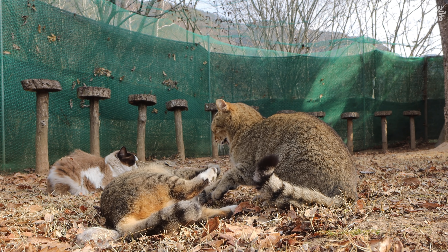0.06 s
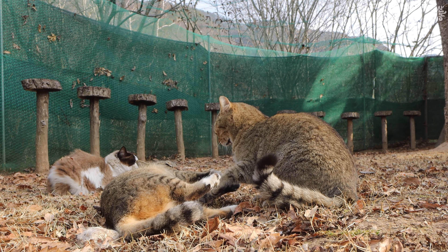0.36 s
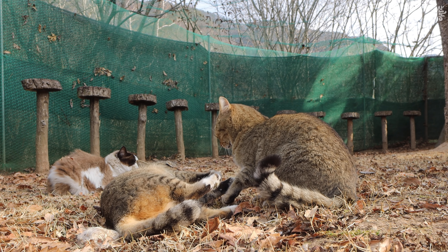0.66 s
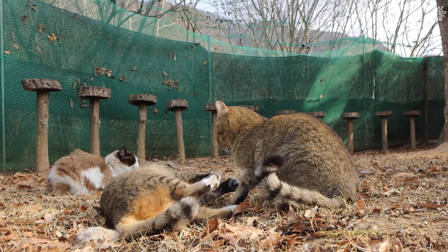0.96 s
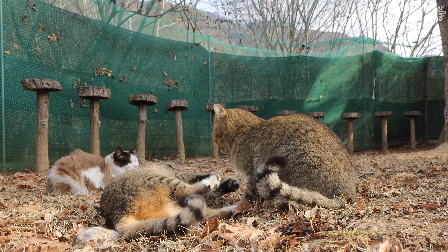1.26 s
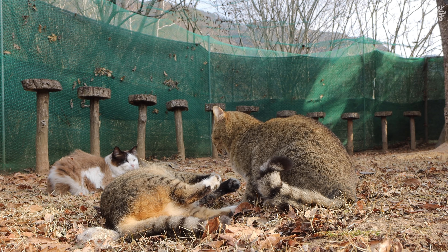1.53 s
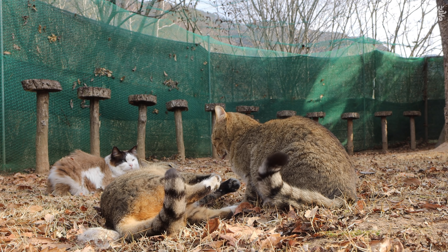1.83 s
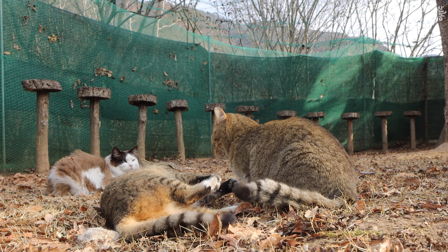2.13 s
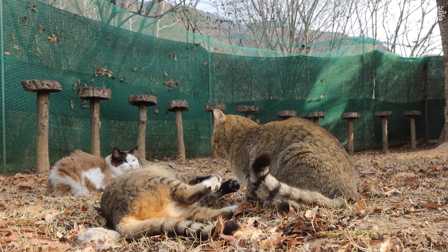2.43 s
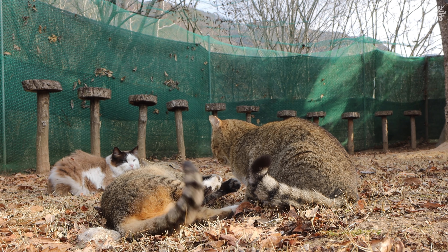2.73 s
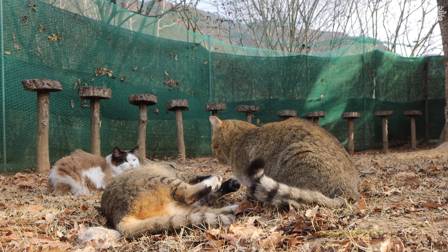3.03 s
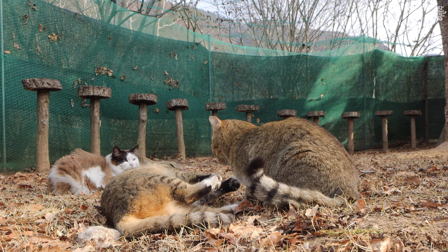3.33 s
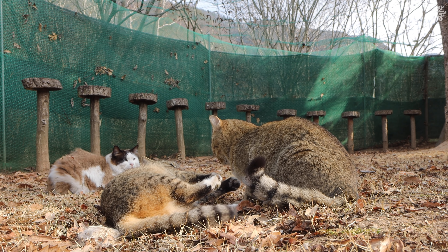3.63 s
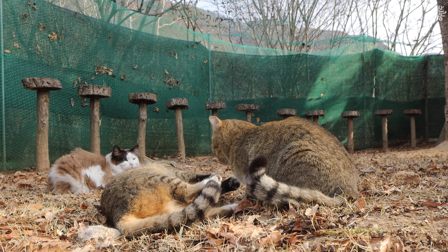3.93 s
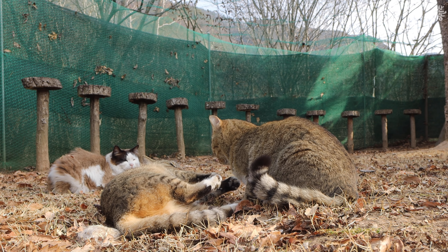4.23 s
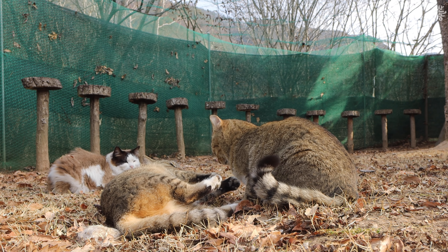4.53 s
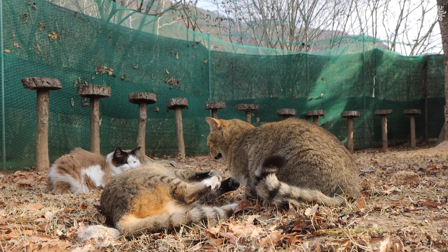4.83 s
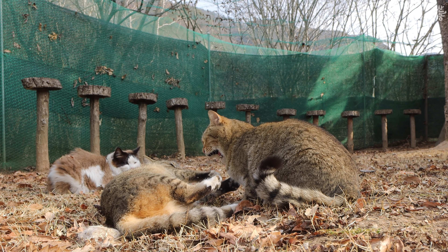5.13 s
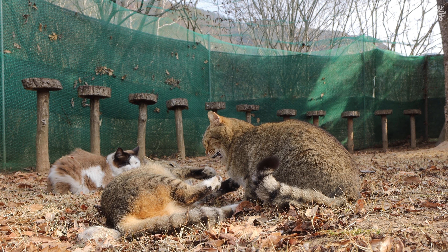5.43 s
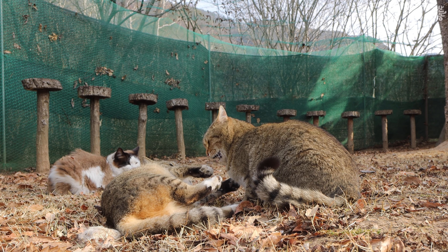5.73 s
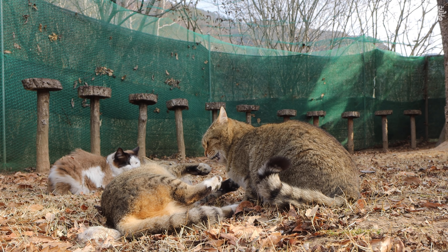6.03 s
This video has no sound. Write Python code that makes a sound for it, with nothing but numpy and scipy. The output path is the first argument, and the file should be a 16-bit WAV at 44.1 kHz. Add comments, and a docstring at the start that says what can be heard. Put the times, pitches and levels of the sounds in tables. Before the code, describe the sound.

A cat gives two long, drawn-out yowls outdoors, with faint raspy bird chirps and a couple of brief leaf rustles between them.

```python
"""A fenced yard, where two cats square off on dry leaves. One yowls twice: its vocal folds drive the
resonances of a throat whose mouth opens wide, then closes to a thin whine. Between the yowls come a
faint moan, tail swishes in the leaves and a soft thud. Off to the right a small bird scolds in raspy,
frequency-modulated notes, and one thin whistle falls. Trees and fence scatter a short echo, and a low
outdoor rumble lies under it all."""
import sys
import numpy as np
from scipy import signal
from scipy.fft import rfft, irfft, next_fast_len
from scipy.io import wavfile
from scipy.ndimage import map_coordinates

SR = 44100
rng = np.random.default_rng(int(sys.argv[2]) if len(sys.argv) > 2 else 0)


def generate_wav(sig):
    """Save sig (samples, or channels by samples) to the path in sys.argv[1] as 16-bit PCM at SR."""
    pcm = np.round(np.clip(np.atleast_2d(sig).T, -1, 1) * 32767).astype(np.int16)
    wavfile.write(sys.argv[1], SR, pcm)


N = 267674
TIME = np.arange(N) / SR


def amp(db):
    """Decibels to amplitude ratio."""
    return 10 ** (np.asarray(db) / 20)


def unit(x):
    """Normalisation to rms 1."""
    return x / np.sqrt(np.mean(x ** 2) + 1e-20)


def along(points, hz):
    """Interpolation of (Hz, value) points on a logarithmic frequency axis."""
    knots_hz, values = np.transpose(points)
    return np.interp(np.log(hz + 1), np.log(knots_hz + 1), values)


def curves(rows, at=TIME):
    """Linear interpolation of each later column against the first."""
    knots, *columns = np.transpose(rows)
    return [np.interp(at, knots, column) for column in columns]


def gate(start, end, edge_s=0.0068):
    """A window of one from start to end, with soft edges outside."""
    return np.clip(1 + np.minimum(TIME - start, end - TIME) / edge_s, 0, 1) ** 2


def bump(x, width):
    """A Gaussian bell around zero."""
    return np.exp(-(x / width) ** 2)


def wobble(rate):
    """Smooth random modulation: a spline through `rate` knots a second."""
    return map_coordinates(rng.standard_normal(int(N * rate / SR) + 4), [TIME * rate])


def filtered(x, response):
    """Linear filtering: the spectrum is multiplied by a frequency response."""
    size = next_fast_len(N + 8192)
    return irfft(rfft(x, size) * response(np.fft.rfftfreq(size, 1 / SR)), size)[..., :N]


def noise(spectrum, coherence):
    """Coloured stereo noise of rms 1: the balance of mid and side sets the left-right coherence."""
    def response(hz):
        angle = np.arccos(np.clip(along(coherence, hz), -1, 1)) / 2
        return amp(along(spectrum, hz)) * [np.cos(angle), np.sin(angle)]
    mid, side = filtered(rng.standard_normal((2, N)), response)
    return unit(np.array([mid + side, mid - side]))


def cycle(hz):
    """Phase as the integral of frequency."""
    return 2 * np.pi * np.cumsum(hz) / SR


def pan(left_db):
    """Direction by level difference, left minus right."""
    return amp(np.array([[.5], [-.5]]) * left_db)


# Spectrum of the outdoor air. Each row: frequency in Hz, relative level in dB.
AIR_SPECTRUM = [(12, -22.5), (22, -11.5), (65, -5), (105, -5), (180, -4), (330, -6), (480, -8),
                (700, -11.5), (1200, -14.5), (1700, -20), (3500, -28.5), (5600, -33), (8000, -47.5),
                (14000, -51)]
# Likeness of the air at the two ears. Each row: frequency in Hz, coherence from 0 to 1.
AIR_COHERENCE = [(25, .95), (70, .62), (200, .58), (700, .55), (1500, .4), (5000, .15)]


def rumble(db=-47):
    """Distant outdoor noise drifts in level; its coherence between the ears falls with frequency."""
    return amp(db + 0.3 * wobble(1)) * noise(AIR_SPECTRUM, AIR_COHERENCE)


# The bird's scolding notes. Each row: start in seconds, level in dB.
SCOLD_NOTES = [(-.008, -49), (0.157, -52), (1.27, -49), (1.427, -47.5), (1.584, -50.5), (3.506, -52.5),
               (3.658, -52.5), (3.814, -53), (5.229, -51.5), (5.379, -51), (5.532, -55)]
# Spectrum of their rasp. Each row: frequency in Hz, relative level in dB.
RASP_SPECTRUM = [(2500, -29.5), (3500, -9.5), (4300, -8.5), (5500, -6.5), (7000, -4), (8500, -7),
                 (9700, -17.5), (12000, -40.5), (16000, -53.5)]
NOTE_S, NOTE_EDGE_S = 0.089, 0.014
LOW_VOICE_HZ, LOW_TURN_S, LOW_RISE_HZ = 4104, .028, 1810  # falls, turns and rises
HIGH_VOICE_HZ, HIGH_RISE_HZ = 7100, 1850  # rises ever faster
HIGH_PEAK_S, HIGH_WIDTH_S = .056, .025  # and sounds mostly in mid note


def scolding(rasp_db=-1.0, low_db=-1.5, high_db=-3):
    """Biphonation: each note is two fluttering, gliding voices inside amplitude-modulated noise."""
    notes = np.zeros((2, N))
    rasp = noise(RASP_SPECTRUM, [(5000, .1)]) * amp(2 * wobble(350))
    low_flutter = 1 + .02 * wobble(600) + .012 * wobble(70)
    high_flutter = 1 + .024 * wobble(900) + .012 * wobble(90)
    detunings = 1 + 0.015 * rng.standard_normal(len(SCOLD_NOTES))
    for (start, db), detune in zip(SCOLD_NOTES, detunings):
        envelope = gate(start, start + NOTE_S, NOTE_EDGE_S)
        on = envelope > 0
        t = TIME[on] - start
        low_hz = LOW_VOICE_HZ + LOW_RISE_HZ * ((t - LOW_TURN_S) / (NOTE_S - LOW_TURN_S)) ** 2
        high_hz = HIGH_VOICE_HZ + HIGH_RISE_HZ * (t / NOTE_S) ** 2
        high_swell = bump(t - HIGH_PEAK_S, HIGH_WIDTH_S)
        low = amp(low_db) * np.sin(cycle(detune * low_hz * low_flutter[on]))
        high = amp(high_db) * high_swell * np.sin(cycle(detune * high_hz * high_flutter[on]))
        notes[:, on] += envelope[on] * amp(db) * (low + high + amp(rasp_db) * rasp[:, on])
    return notes * pan(left_db=-6)


# Colour of the cat's voice on its way over the ground. Each row: frequency in Hz, gain in dB.
VOICE_COLOUR = [(500, 0), (1100, -1.1), (1700, -24.2), (2400, -14.4), (3300, -26.1), (4200, -10.2),
                (5000, 6.7), (6000, 11), (7100, 17), (8500, 8)]
# Damping of the throat. Each entry: bandwidth of one formant in Hz, lowest formant first.
FORMANT_WIDTHS = [106, 830, 347, 500]


def throat(hz, formants):
    """Four resonators in series multiply their responses; the fourth rides above the third."""
    gain = amp(along(VOICE_COLOUR, hz))
    for centre, width in zip([*formants, 1.246 * formants[-1]], FORMANT_WIDTHS):
        gain = gain * centre ** 2 / (centre ** 2 - hz ** 2 + 1j * hz * width)
    return gain


# The throat from shut to wide. Each row: opening from 0 to 1, source tilt in dB per octave,
# then the low, middle and upper formants in Hz.
MOUTH_SHAPES = [(0, -3.3, 764, 1320, 3170), (.2, -3.6, 905, 1970, 2350), (.4, -0.1, 1347, 1960, 2710),
                (.6, 1.8, 1622, 1910, 2760), (.8, 2.4, 1771, 2550, 2930), (1, 2.5, 1967, 3390, 3430)]
CATCH_HZ, CATCH_S, CATCH_DULL_DB = 223.1, .009, 11.5  # the voice breaks in dull and high, then settles
HOARSE_SHUT_DB, HOARSE_WIDE_DB = -12, -5  # turbulence in the throat grows with the opening
GROWL_AT_S, GROWL_S, GROWL_DB = 4.82, .08, 8  # a rasp as the second yowl swells
HOLLOW_HZ, HOLLOW_WIDTH_HZ, HOLLOW_DB, HOLLOW_S = 4500, 420, 12.5, 0.22  # overtones dip around the rasp


def yowl(contour, gape, catches=False, whine_jitter=0.0088, shimmer_db=0.29, lips_part=0.46, count=14):
    """Source and filter: vocal-fold harmonics and turbulence pass through a throat that changes shape."""
    window = gate(contour[0][0], contour[-1][0])
    on = window > 0
    pitch, db = curves(contour, TIME[on])
    opening, = curves(gape)
    tilt_db, *formants = curves(MOUTH_SHAPES, opening[on])
    catch = catches * np.exp(-np.maximum(TIME[on] - contour[0][0], 0) / CATCH_S)
    pitch += CATCH_HZ * catch
    tilt_db -= CATCH_DULL_DB * catch
    hollow_db = HOLLOW_DB * bump(TIME[on] - GROWL_AT_S, HOLLOW_S)
    growl_db = GROWL_DB * bump(TIME - GROWL_AT_S, GROWL_S)
    turbulence = amp(HOARSE_SHUT_DB + (HOARSE_WIDE_DB - HOARSE_SHUT_DB) * opening + growl_db)
    tremor = (.0011 + .0014 * turbulence) * wobble(200) + .001 * wobble(25)
    # with the mouth shut the folds run less steadily
    shut = np.clip(1 - opening[on] / lips_part, 0, 1)
    pitch *= 1 + tremor[on] + whine_jitter * shut * wobble(110)[on]
    phase = cycle(pitch)
    voice, power, envelope, puffs = np.zeros((4, N))
    for k in range(1, count + 1):
        source_db = (tilt_db + 0.45 * wobble(18)[on]) * np.log2(k)  # higher overtones waver more
        notch_db = hollow_db * bump(k * pitch - HOLLOW_HZ, HOLLOW_WIDTH_HZ)
        harmonic = amp(source_db - notch_db) * throat(k * pitch, formants)
        voice[on] += np.imag(harmonic * np.exp(1j * k * phase))
        power[on] += np.abs(harmonic) ** 2 / 2
    envelope[on] = amp(db + (shimmer_db + 1.4 * shut) * wobble(60)[on]) / np.sqrt(power[on])
    puffs[on] = (1 + np.cos(phase)) * rng.standard_normal(len(phase))  # air escapes once a cycle
    return window * envelope * (voice + turbulence * breath(puffs, gape))


def breath(puffs, gape, corner_hz=3000):
    """Aspiration: high-passed puffs of air hiss in the throat's moving upper resonances."""
    hz, t, spectra = signal.stft(puffs, SR, nperseg=512)
    hz = hz[:, None]
    opening, = curves(gape, t)
    _, *formants = curves(MOUTH_SHAPES, opening)
    highpass = hz ** 2 / (hz ** 2 + corner_hz ** 2)
    return signal.istft(spectra * highpass * np.abs(throat(hz, formants)), SR)[1][:N]


# Two open-mouthed yowls and the shut-mouthed whines that end them.
# Each row: time in seconds, pitch in Hz, level in dB.
FIRST_YOWL = [(0.0, 616, -16.5), (0.04, 621.7, -18), (0.122, 587, -17.5), (0.178, 556, -21.5),
              (0.346, 542, -24.5), (0.41, 560, -26), (0.456, 548, -29.5), (0.55, 535.3, -26.5),
              (0.594, 518.5, -25.5), (0.612, 524.4, -29.5), (0.65, 562, -40.5)]
FIRST_WHINE = [(.68, 576, -42), (0.729, 537.5, -45.5), (.97, 533, -44.5), (1.13, 519, -41),
               (1.36, 510.4, -40.5), (1.436, 467.6, -37), (1.456, 508, -41.5)]
SECOND_YOWL = [(4.63, 608.7, -42.5), (4.696, 538.6, -25), (4.72, 532.7, -25), (4.79, 560.0, -22.5),
               (4.928, 595.3, -18), (5.058, 587.8, -16.5), (5.292, 581.4, -17), (5.482, 547, -20),
               (5.56, 535.4, -24), (5.608, 515.5, -24), (5.626, 529.5, -27.5), (5.732, 531.6, -27),
               (5.836, 511.7, -26), (5.864, 490.6, -28), (5.89, 498.3, -37)]
SECOND_WHINE = [(5.914, 521, -39), (5.985, 520.7, -41), (6.02, 473.3, -33), (6.07, 500, -36)]
# The mouth in each yowl. Each row: time in seconds, opening from 0 (shut) to 1 (wide).
FIRST_GAPE = [(0, .95), (.06, 0.95), (0.121, 0.83), (.19, 0.68), (0.411, 0.62), (.47, 0.46), (0.601, 0.29),
              (.67, 0.048)]
SECOND_GAPE = [(4.63, 0.29), (4.7, 0.79), (4.8, 0.95), (4.919, 0.99), (5.35, 0.95), (5.519, 0.79),
               (5.601, 0.543), (5.831, .37), (5.911, 0.12)]


def yowls():
    """Phonation runs on as the mouth closes, so each of the two yowls trails off in a whine."""
    first = yowl(FIRST_YOWL + FIRST_WHINE, FIRST_GAPE)
    second = yowl(SECOND_YOWL + SECOND_WHINE, SECOND_GAPE, catches=True)
    return first + second


# Treble lost when the voice is dull. Each row: frequency in Hz, gain in dB.
TREBLE_CUT = [(3700, 0), (4400, -10.5), (5000, -14), (7000, -11)]
# The yowl's upper overtones. Each row: time in seconds, brightness from 0 (dull) to 1 (full).
BRIGHTNESS = [(4.6, 0.05), (4.68, 0.99), (4.93, 0.63), (5.08, 0.98)]
# Stereo balance of the voice. Each row: frequency in Hz, left minus right level in dB.
VOICE_BALANCE = [(550, 4.5), (1170, 1.5), (1930, 1), (3160, -0.5), (5200, -3.5)]


def voice_at_ears(voice, left_lead_s=.00003):
    """A crossfade varies the treble; level and time differences between the ears place the voice."""
    dull = filtered(voice, lambda hz: amp(along(TREBLE_CUT, hz)))
    brightness, = curves(BRIGHTNESS)
    heard = dull + brightness * (voice - dull)
    advance_s = np.array([[.5], [-.5]]) * left_lead_s
    return filtered(heard, lambda hz: pan(along(VOICE_BALANCE, hz)) * np.exp(2j * np.pi * hz * advance_s))


# Tails and paws in the leaves. Each row: peak time in seconds, level in dB, seconds to rise 20 dB,
# seconds to fall 20 dB, relative level of a stiff leaf's crack in dB.
SWISHES = [(0.595, -55.5, 0.013, 0.051, -7), (.709, -56.5, 0.012, .045, -9),
           (0.921, -61, 0.064, 0.0403, -20), (1.19, -56.5, 0.027, 0.2, -5), (2.109, -36, 0.021, 0.042, -14),
           (2.19, -49, 0.073, 0.12, -23), (2.532, -34.5, 0.045, 0.0087, -6.5),
           (2.596, -47, 0.2, 0.099, -18)]
# Spectra of swept leaves and of cracks. Each row: frequency in Hz, relative level in dB.
SWISH_SPECTRUM = [(300, -0.5), (1000, -1), (1800, -0.5), (2800, -7.5), (5500, -5.5), (8000, -1.5),
                  (10500, -7.5), (15000, -14)]
CRACK_SPECTRUM = [(700, -39), (1150, -8), (1500, -8.5), (1850, 1.5), (2100, -12.5), (2400, -4),
                  (3000, -23.5), (6000, -55)]


def leaves(crackle_db=3):
    """Noise under exponential envelopes: dry leaves crackle with each swish, and stiff ones crack."""
    swells = np.array([amp(db - 20 * np.maximum((peak - TIME) / rise, (TIME - peak) / fall))
                       for peak, db, rise, fall, _ in SWISHES])
    crackle = unit(noise(SWISH_SPECTRUM, [(1500, 0.88), (8000, 0.12)]) * amp(crackle_db * wobble(900)))
    swishes = np.linalg.norm(swells, axis=0) * crackle  # overlapping swishes add in power
    crack_gains = amp(np.array(SWISHES)[:, -1])
    cracks = crack_gains @ swells * noise(CRACK_SPECTRUM, [(1500, 0.87)]) * pan(left_db=5.0)
    return swishes + cracks


# Spectrum of the background hiss. Each row: frequency in Hz, relative level in dB.
HISS_SPECTRUM = [(1500, -22.5), (4000, 4), (8000, 0.5), (11000, -6.5), (15500, -26)]
# Its swells. Each row: peak time in seconds, level in dB.
HISS_SWELLS = [(.8, -75), (1.4, -61), (3.2, -67.5), (4.1, -71), (4.9, -59)]


def hiss(swell_s=.27, rest_db=-87):
    """Amplitude modulation: a faint, high, crackly hiss swells and fades in the background."""
    crackle = unit(noise(HISS_SPECTRUM, [(5000, 0.41)]) * amp(3 * wobble(420) + 1.5 * wobble(32)))
    envelope = amp(rest_db) + sum(amp(db) * bump(TIME - peak, swell_s) for peak, db in HISS_SWELLS)
    return envelope * crackle


def moan(start=2.72, length_s=0.412, fade_s=0.076, hz=424, rise_hz_per_s=26, db=-55, swell_db_per_s=12):
    """Jitter and shimmer make a closed-mouth moan waver; the second of its two harmonics is stronger."""
    t = np.clip(TIME - start, 0, length_s)
    phase = cycle((hz + rise_hz_per_s * t) * (1 + .02 * wobble(130)))
    envelope = gate(start, start + length_s, fade_s) * amp(db + swell_db_per_s * t)
    shimmer = amp(1.5 * wobble(30))
    return envelope * shimmer * (amp(-2) * np.sin(phase) + np.sin(2 * phase))


def whistle(start=3.145, length_s=0.079, fade_s=0.031, hz=6850, fall_hz_per_s=4800, db=-67):
    """Frequency modulation: one thin bird note, a pure tone that flutters as it falls."""
    pitch = hz - fall_hz_per_s * (TIME - start)
    flutter = 1 + .007 * wobble(500)
    envelope = gate(start, start + length_s, fade_s) * amp(db)
    return envelope * np.sin(cycle(pitch * flutter)) * pan(left_db=-14)


def thud(peak_s=3.775, hz=105, db=-38.5, slope_s=0.028):
    """A soft push on the soil holds mainly low frequencies: tone and noise swell and die exponentially."""
    soil = noise([(30, -12), (70, -1.5), (150, -8.5), (300, -12), (1000, -61.5)], [(100, 0.48)])
    tone = np.sin(cycle(hz * (1 + 0.1 * wobble(70))))
    envelope = amp(db - 8 * np.abs(TIME - peak_s) / slope_s)
    return envelope * (tone + 0.8 * soil)


def squeak(start=4.658, length_s=0.053, hz=4800, fall_hz_per_s=28000, db=-50.5):
    """A linear chirp: a thin squeak falls above the voice as the mouth opens for the second yowl."""
    pitch = hz - fall_hz_per_s * (TIME - start)
    return gate(start, start + length_s) * amp(db) * np.sin(cycle(pitch))


# Reverberation of the yard. Each row: frequency in Hz, seconds to decay by 60 dB.
YARD_DECAY = [(300, 0.41), (3000, 0.63), (8000, 0.3), (14000, 0.028)]


def yard_echo(sound):
    """Scattering from trees and fence: convolution with decaying noise, different at each ear."""
    hz, t, spectra = signal.stft(rng.standard_normal((2, SR // 2)), SR, nperseg=256)
    decay = amp(-60 * t / along(YARD_DECAY, hz)[:, None])
    tail = signal.istft(spectra * decay, SR)[1]
    return signal.fftconvolve(sound, tail / np.linalg.norm(tail[0]), axes=1)[:, :N]


def scene(yowl_db=.5, cat_echo_db=-23, bird_echo_db=-5, rustle_echo_db=-16):
    """The share of echo grows with distance: the near cats are almost dry, the birds farther off."""
    cats = voice_at_ears(amp(yowl_db) * yowls() + squeak() + moan())
    birds = scolding() + whistle()
    rustle = leaves() + hiss()
    echo = yard_echo(amp(cat_echo_db) * cats + amp(bird_echo_db) * birds + amp(rustle_echo_db) * rustle)
    return cats + birds + rustle + echo + thud() + rumble()


def record(dry, top_hz=15750):
    """An ideal low-pass filter keeps nothing above the band limit."""
    return filtered(dry, lambda hz: hz < top_hz)


dry = scene()
out = record(dry)
generate_wav(out)
```